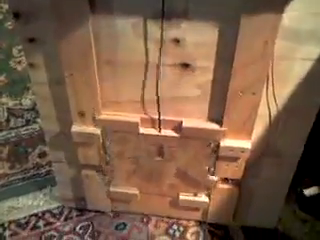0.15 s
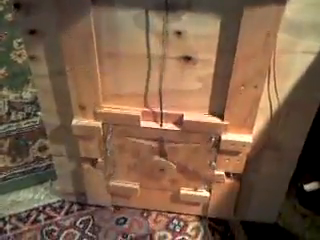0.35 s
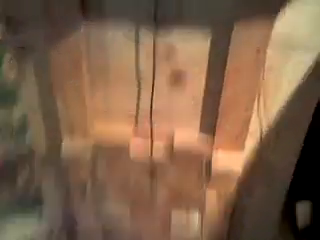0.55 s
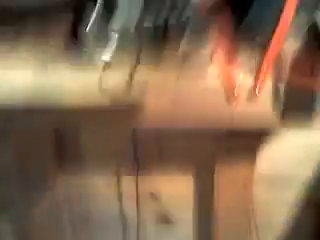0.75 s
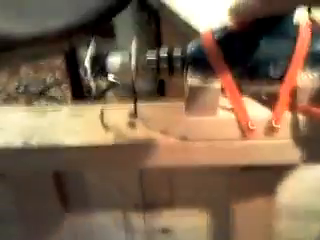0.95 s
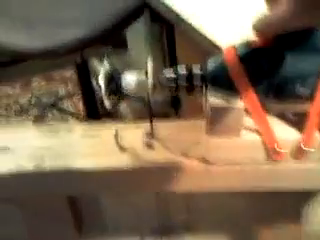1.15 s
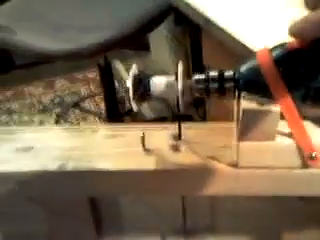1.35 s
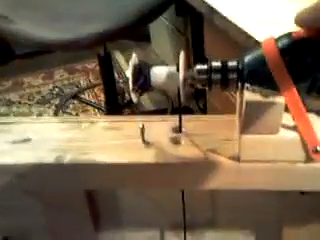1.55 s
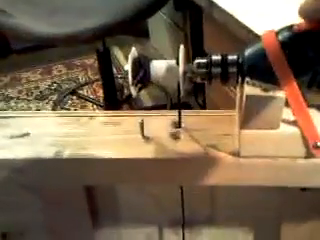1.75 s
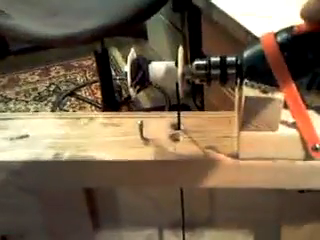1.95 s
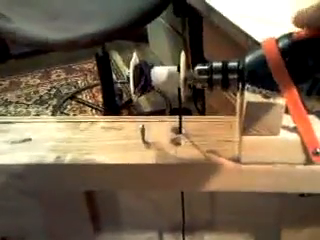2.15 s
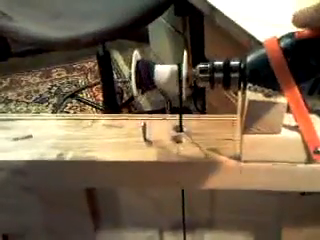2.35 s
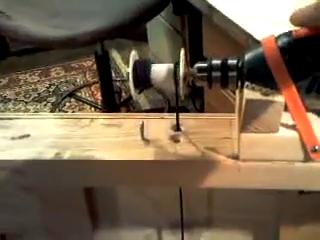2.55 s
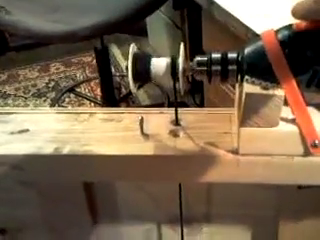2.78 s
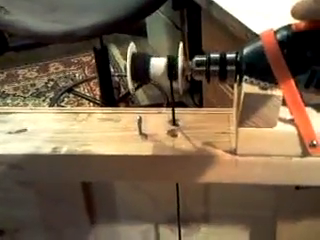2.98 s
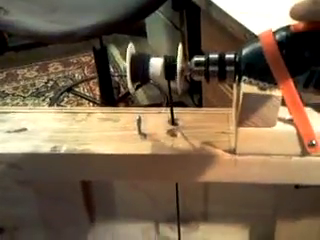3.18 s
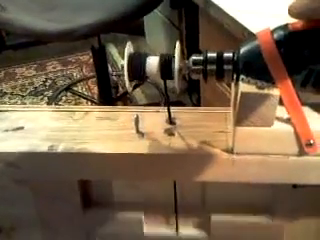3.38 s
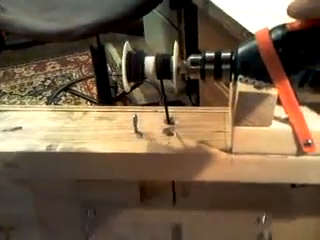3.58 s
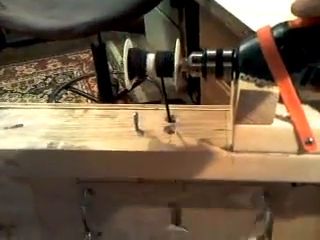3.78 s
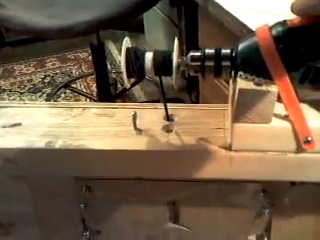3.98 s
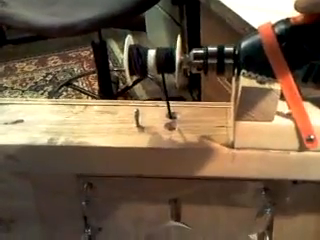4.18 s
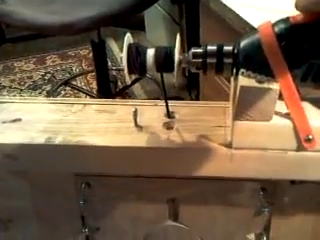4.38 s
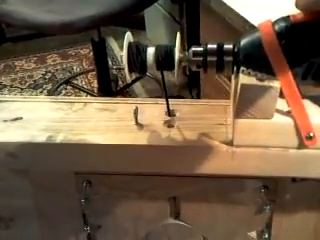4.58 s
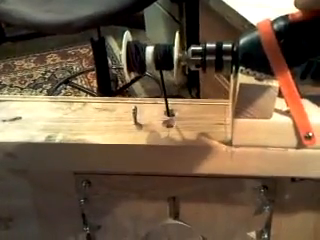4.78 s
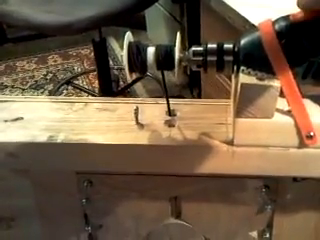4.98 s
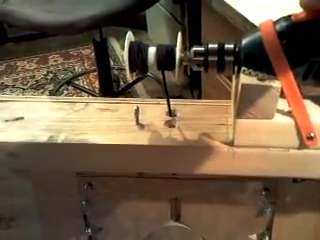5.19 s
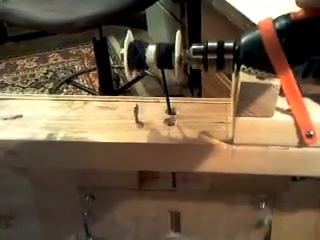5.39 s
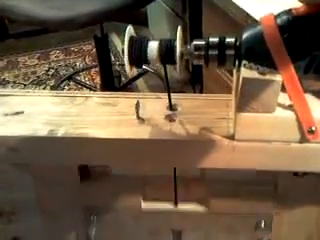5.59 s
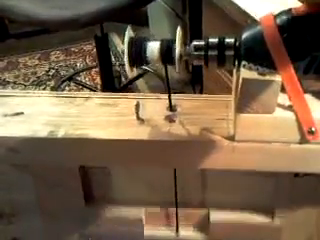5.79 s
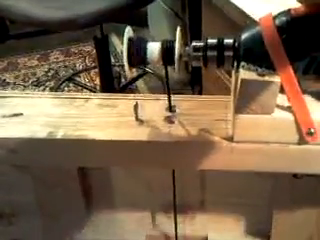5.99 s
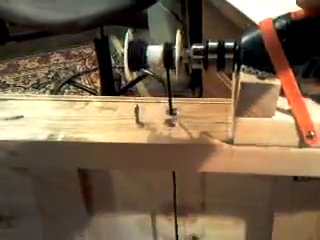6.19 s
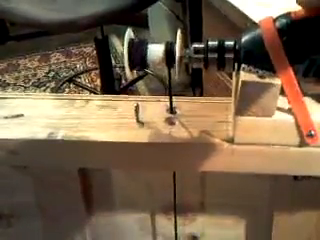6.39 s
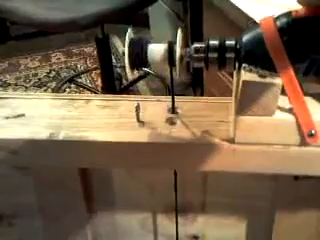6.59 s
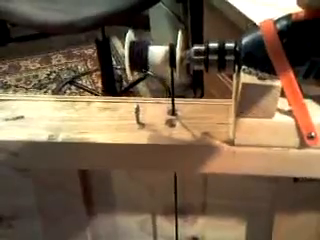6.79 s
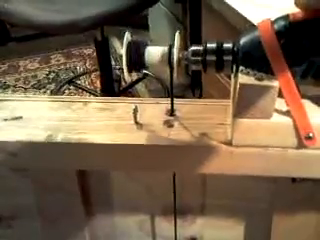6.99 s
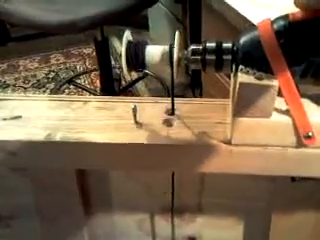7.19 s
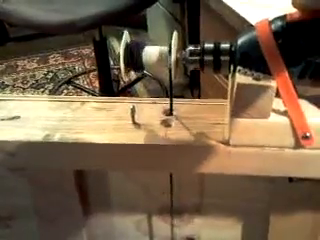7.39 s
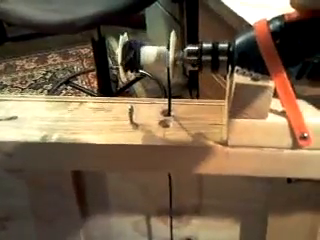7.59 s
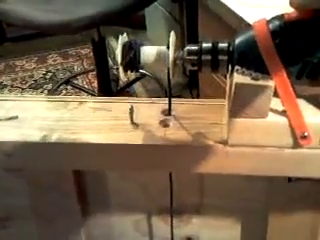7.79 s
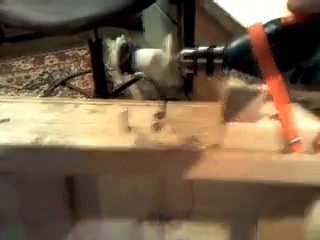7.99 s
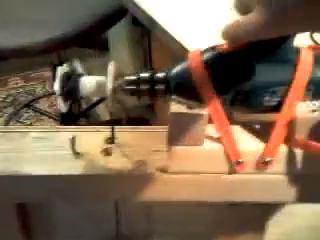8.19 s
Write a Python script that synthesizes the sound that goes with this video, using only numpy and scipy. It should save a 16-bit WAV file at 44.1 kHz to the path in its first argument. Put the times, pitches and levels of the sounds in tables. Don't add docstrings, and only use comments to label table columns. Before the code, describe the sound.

A small close microphone in a quiet room picks up low rumble, faint hums and a drill already running, lowering with a gritty geared whirr. At 0.23 s a wooden flap thuds rapidly, then slams at 0.35 s, hard enough to distort, while the brush hiss coasts away. Small ticks come near 0.7 s. A thin electronic whine at 2.05 s leads into the lift at 2.2 s: rattling, bright and hissy, climbing quickly then levelling, with knocks and a sharp slam at 2.4-2.5 s. A strong click marks 3.9 s and the motor drops dead by 4.1 s. Quiet, a faint tick at 5.0 s. At 5.2 s a duller lowering run starts, peaks in pitch around 5.75 s and slowly sags, with soft cord hum and knocks near 6.2-6.3 s. Thuds at 7.26 s and a distorted slam at 7.38 s end it; hiss coasts into quiet, with a faint tick at 8.1 s.

```python
import sys
import numpy as np
from scipy import signal
from scipy.fft import rfft, irfft, next_fast_len
from scipy.io import wavfile
from scipy.ndimage import uniform_filter1d

SR = 44100
rng = np.random.default_rng(int(sys.argv[2]) if len(sys.argv) > 2 else 0)


def invert_db(x):
    u = np.asarray(x, float) / 20
    return 10 ** u


def transcribe(signal):
    frames = np.atleast_2d(signal).T
    limited = np.clip(frames, -1, 1)
    pcm = np.round(limited * 32767).astype(np.int16)
    wavfile.write(sys.argv[1], SR, pcm)


N = 363825
TIME = np.arange(N) / SR

# time [s], effort [dB].
LOWER_END_EFFORT = [(0.0, -2.5), (0.225, -4)]
LIFT_EFFORT = [(2.2, -30), (2.28, -8), (2.36, -2), (2.5, -2), (3.6, 1.5), (3.78, -1.5), (3.9, 0),
               (3.99, -8.5), (4.06, -45)]
LOWER_EFFORT = [(5.22, -31), (5.3, -9), (5.42, -3), (5.55, -0.5), (7.26, -0.5)]
# time [s], mesh frequency [Hz].
LOWER_END_MESH = [(0, 692.3), (.225, 680.5)]
LIFT_MESH = [(2.2, 420), (2.35, 638), (2.47, 788), (2.65, 916), (2.95, 1074), (3.12, 1133), (3.28, 1171),
             (3.62, 1198), (4.08, 412)]
LOWER_MESH = [(5.22, 306), (5.55, 677), (5.74, 978), (5.95, 912), (6.25, 831), (6.43, 782), (6.7, 747),
              (7.0, 723), (7.26, 712)]
# rattle, hiss, mesh tone, other tones [dB].
LIFT_LEVELS = (-23.5, -31, -26.5, -21)
LOWER_LEVELS = (-25.5, -38.5, -31, -26.5)
ORDERS = [3, 4, 5, 6, 7, 8, 9, 11, 12, 13, 14, 16, 17, 19, 20, 21, 23, 27, 30, 33, 34, 36, 40]
LIFT_ORDERS_DB = [-13.5, -35.5, -26, -17.5, -12.5, -35, -14, -9.5, -8, -9, -49, -10.5, -4, -19, -4.5, -19,
                  -11, -20, -7, -37, -18.5, -16, -15.5]
LOWER_ORDERS_DB = [-6, -26, -20, -22, -20, -14, -6, -9, -8, -9, -20, -22, -18, -26, -24, -24, -22, -34, -34,
                   -36, -36, -36, -32]
# centre [Hz], width [Hz], gain [dB].
HOUSING = [(238, 70, -12), (296, 43, 15.5), (334, 54, 13), (550, 93, 15), (849, 100, 10.5), (1000, 140, 5),
           (1260, 48, 8), (1977, 114, 16), (2225, 145, 16), (2876, 82, 13), (3460, 110, -0.5),
           (3900, 300, 10)]
FRAME = [(743, 65, 8.5), (1000, 73, 14.5), (1200, 67, 5.5)]
VENTS = [(5750, 220, 17), (7050, 500, 13), (7950, 350, 17), (9700, 1000, -25)]
# frequency [Hz], density [dB per Hz].
RATTLE_UP = [(71, -47.5), (120, -18), (251, -14), (334, 2.5), (412, -15), (532, -3), (604, -4), (1240, 6),
             (1580, -3), (1940, 5), (2280, -3.5), (2720, -22), (3570, -10), (5240, -24), (5500, -21.5),
             (7150, -55), (12100, -120)]
RATTLE_DOWN = [(71, -41.5), (120, -12), (220, -31), (324, -4.5), (405, -19), (515, -8.5), (624, -16.5),
               (756, 2.5), (832, -9), (1010, 0), (1260, -1), (1580, -10.5), (2170, -10), (2720, -30),
               (5500, -30), (7150, -47), (12100, -120)]
HISS = [(2470, -28.5), (4200, -5.5), (4550, -22), (4920, -7.5), (5350, -25.5), (5750, -1), (6120, -8),
        (6620, -4.5), (8140, -1), (9110, -4.5), (9440, -27.5), (9690, -30.5), (9970, -23), (13000, -54.5),
        (21900, -120)]
# cycles a rotor turn, level over the hiss [dB].
COMMUTATOR = [(50, -19), (60, -15), (70, -16), (80, -16)]
# frequency [Hz], level [dB], t60 [s].
CASE_MODES = [(768, 3, 0.04), (1010, 6, 0.026), (1235, 6, .03), (1975, -10, 0.03)]
# start [s], length [s], pitch [Hz], level [dB].
CORD = [
    (0.0, 0.25, 342, -37.5),
    (5.943, 0.22, 346, -41),
    (6.191, .35, 319, -42.5),
    (6.584, 0.53, 335, -39.5),
]
# start [s], length [s], level [dB], on-share of each cycle.
SWITCH = [
    (2.05, .22, -37, .23),
    (2.3, .4, -45, .25),
    (5.215, .2, -46, .47),
    (6.3, .96, -44, .25),
]
SWITCH_MULTIPLES = [1, 2, 3, 6, 7, 8, 9]
SWITCH_DB = [-1.5, 0, -22, -31, -38, -20, -9.5]
# start [s], peak [dB], contact time [s], treble tilt [dB an octave], pitch of the struck spot [Hz].
THUDS = [
    (.228, 1, 0.011, -10, 325),
    (.235, -8.5, 0.0067, 11, 1040),
    (.243, 1.5, .012, -6.5, 311),
    (.259, -6.5, 0.014, 2, 2126),
    (6.228, -14.5, 0.004, -9, 300),
    (6.255, -10, 0.016, -7, 231),
    (7.262, 1, 0.018, -5, 296),
    (7.272, -5.5, 0.011, 3.5, 774),
    (7.288, -0.5, 0.021, -3, 328),
]
SLAMS = [
    (.3462, 4.5, 0.0095, -2.4, 1400),
    (2.4968, 4, 0.014, 1, 1020),
    (2.519, -21, 0.0027, 0.34, 1150),
    (7.377, 5, 0.015, -0.94, 1010),
    (7.402, -14, 0.0059, -1.1, 921),
]
TICKS = [(0.715, -25, 0.0034, -16, 525), (0.728, -31, 0.003, -4, 875), (0.752, -20.5, 0.0058, 8, 252),
         (0.754, -9, 0.0017, 9, 1470), (2.156, -18, 0.0087, -2, 1030), (2.28, -33, 0.0035, -6, 732),
         (2.413, -9.5, 0.009, 0, 1000), (2.427, -6, 0.0081, 0.5, 1250), (3.589, -23, 0.0031, 1.5, 1200),
         (3.733, -24, 0.003, 1.5, 972), (3.883, -4, 0.0054, 8, 706), (5.034, -31.5, 0.0095, -7, 794),
         (5.294, -17.5, 0.003, 0, 977), (5.489, -19, 0.0041, 13, 1000), (5.72, -18, 0.0027, 9, 953),
         (6.314, -7, 0.009, 7, 777), (8.132, -24.5, 0.0034, -6, 497)]
# frequency [Hz], level [dB], t60 [s].
THUD_MODES = [(325, -1.5, .04), (430, -8.5, 0.038), (605, 1.5, 0.023), (1056, 4, 0.05), (1400, -18, 0.027)]
SLAM_MODES = [(438, -11, 0.1), (576, -9.5, 0.11), (813, -5, .07), (899, 0.5, 0.11), (1030, -4, 0.08),
              (1147, 16.5, 0.014), (1360, -15, 0.037), (1657, -4, 0.072), (2050, -5, .04),
              (2980, -11.5, 0.062), (4130, -17.5, 0.04)]
TICK_MODES = [(264, -19, 0.016), (600, -24, 0.01), (1070, 2, 0.013), (1830, -22.5, .01)]
# frequency [Hz], density [dB per Hz].
CRACK = [(88, -19), (150, -13.5), (679, -4.5), (1370, -4), (1980, -2.5), (2770, -18.5), (4850, -21),
         (5890, -38), (7530, -30.5), (9970, -76), (13000, -75), (21900, -120)]
FLOOR = [(8.8, -31), (15, 3.5), (48, -6), (147, -6.5), (283, -15), (361, -15), (449, -18), (962, -19),
         (1040, -22), (1160, -19), (2490, -33), (5790, -32.5), (8020, -35.5), (8700, -38), (9970, -51.5),
         (13000, -99.5), (21900, -120)]
# frequency [Hz], t60 [s].
ROOM = [(200, 0.49), (400, 0.42), (700, 0.46), (2000, 0.3), (4000, 0.2), (9000, 0.14)]
# frequency [Hz], level [dB].
HUMS = [(39.5, -44.5), (79, -53), (118.4, -62), (158, -58), (360.7, -62.5), (1044, -59.5), (4425, -76.5),
        (5750, -74), (6492, -73), (8619, -76.5), (8689, -71.5)]


def evened(x):
    return x / np.sqrt(np.mean(x ** 2) + 1e-20)


def read(points, hz):
    f, value = np.transpose(points)
    return np.interp(np.log(hz + 1), np.log(f + 1), value)


def add(mix, s, sound):
    part = mix[round(s * SR):][:len(sound)]
    part += sound[:len(part)]


def coloured(x, points, tilt_db=0):
    size = next_fast_len(len(x))
    hz = np.fft.rfftfreq(size, 1 / SR)
    gain = invert_db(read(points, hz) + tilt_db * np.log2(hz / 1000 + 0.09))
    return evened(irfft(rfft(x, size) * gain, size)[:len(x)])


def wander(size, rate_hz):
    knots = rng.standard_normal(int(size / SR * 400) + 3)
    knots = uniform_filter1d(knots, max(int(400 / rate_hz), 1))
    return evened(np.interp(np.arange(size) * 400 / SR, np.arange(len(knots)), knots))


def resonance_db(hz, resonances):
    return sum(db / (1 + (2 * (hz - f) / width) ** 2) for f, width, db in resonances)


def background():
    hums = np.zeros(N)
    for hz, db in HUMS:
        hums += invert_db(db + 1.2 * wander(N, 3.6)) * np.sqrt(2) * np.sin(2 * np.pi * hz * TIME)
    floor_db = -43.5 + 0.24 * wander(N, 15)
    return invert_db(floor_db) * coloured(rng.standard_normal(N), FLOOR) + hums


def repeating(turns):
    shapes = rng.standard_normal((2, 257))
    shapes[:, -1] = shapes[:, 0]
    a, b = (np.interp(turns % 1, np.linspace(0, 1, 257), shape) for shape in shapes)
    return evened(a * np.cos(0.032 * turns) + b * np.sin(0.029 * turns))


def chatter(size, per_s):
    t = np.arange(2000) / SR
    ring = sum(invert_db(db - 60 * t / t60) * np.sin(2 * np.pi * hz * t) for hz, db, t60 in CASE_MODES)
    ring *= np.minimum(t / .0015, 1)
    taps = rng.standard_normal(size) * (rng.random(size) < per_s / SR)
    return evened(signal.oaconvolve(taps, ring)[:size])


def rotor_tones(t, turns, rotor_hz, mesh_db, tones_db, orders_db, throb):
    size = len(t)
    out = np.sqrt(2) * throb * invert_db(mesh_db + wander(size, 25)) * np.sin(2 * np.pi * 10 * turns)
    for order, db in zip(ORDERS, orders_db):
        shell_db = resonance_db(order * rotor_hz[::200], HOUSING) - 10
        colour_db = np.interp(t, t[::200], shell_db) + 2.1 * wander(size, 24)
        out += invert_db(tones_db + db + colour_db) * np.sin(2 * np.pi * (order * turns + rng.random()))
    return out


def gear_rattle(turns, slack, throb, flaw, colour):
    size = len(turns)
    gate = (2.3 + np.exp(-(turns % 1) / 0.61)) * throb
    teeth = evened(gate * rng.standard_normal(size)) + flaw * (1 - slack) * repeating(turns)
    teeth += signal.lfilter(*signal.iirpeak(2980, 18, fs=SR), 2.2 * teeth)
    return (1 - 0.33 * slack) * coloured(teeth, colour) + 1.18 * slack * chatter(size, 650)


def brush_hiss(turns, rotor_hz, slack, flaw, bars_db):
    size = len(turns)
    sparks = evened((0.57 + np.exp(-(5 * turns % 1) / 0.21)) * rng.standard_normal(size))
    hiss = coloured(sparks + 0.63 * flaw * (1 - slack) * repeating(turns), HISS)
    for order, db in COMMUTATOR:
        bar_db = bars_db + db - 20 * slack + resonance_db(order * rotor_hz, VENTS)
        smear = .6 * wander(size, 60)
        hiss += invert_db(bar_db) * np.sin(2 * np.pi * order * turns + smear)
    return hiss


def motor(effort, mesh, levels_db, orders_db, rattle, flaw, tight_hz, bars_db, coast_s, coast_db_per_s):
    s, effort_points_db = np.transpose(effort)
    t = np.arange(s[0], s[-1] + coast_s, 1 / SR)
    after = np.maximum(t - s[-1], 0)
    size = len(t)
    effort_db = np.interp(t, s, effort_points_db)
    mesh_hz = np.interp(t, *np.transpose(mesh))
    octaves = np.log2(mesh_hz / 1000)

    rattle_db = levels_db[0] + effort_db
    hiss_db = levels_db[1] + 1.3 * effort_db + 4 * octaves
    mesh_db = levels_db[2] + 0.76 * effort_db + resonance_db(mesh_hz, FRAME)
    tones_db = levels_db[3] + 0.76 * effort_db + 14.5 * octaves

    rotor_hz = mesh_hz / 10 * (1 + .0008 * wander(size, 30))
    turns = np.cumsum(rotor_hz) / SR
    slack = np.clip((tight_hz - mesh_hz) / 130, 0, 1)
    throb = 1 + 0.2 * np.sin(2 * np.pi * .19 * turns)

    out = rotor_tones(t, turns, rotor_hz, mesh_db, tones_db, orders_db, throb)
    out *= invert_db(-20 * slack - 900 * after)
    out += invert_db(rattle_db + 0.72 * wander(size, 40)) * gear_rattle(turns, slack, throb, flaw, rattle)
    out *= invert_db(-1.3 * coast_db_per_s * after)
    hiss_db = hiss_db + 0.68 * wander(size, 20) - coast_db_per_s * after
    out += invert_db(hiss_db) * brush_hiss(turns, rotor_hz, slack, flaw, bars_db)

    fade_in = np.clip((t - t[0]) / 0.019 + (t[0] == 0), 0, 1)
    fade_out = np.clip((t[-1] - t) / 0.15, 0, 1)
    return t[0], out * fade_in * fade_out


def whine(start, length, hz, db, multiples, tones_db, waver, flutter_db, edge_s):
    t = np.arange(0, length, 1 / SR)
    turns = np.cumsum(hz * (1 + waver * wander(len(t), 55))) / SR
    tone = sum(invert_db(d) * np.sin(2 * np.pi * k * turns) for k, d in zip(multiples, tones_db))
    edges = np.clip(np.minimum(t, length - t) / edge_s, 0, 1)
    return start, np.sqrt(2) * invert_db(db + flutter_db * wander(len(t), 25)) * tone * edges


def cord_hum(row):
    return whine(*row, [1], [0], 0.018, 3.0, .015)


def switch_whine(start, length, db, duty):
    pulse = abs(np.sin(np.pi * duty * np.array(SWITCH_MULTIPLES)))
    tones_db = np.array(SWITCH_DB) + 20 * np.log10(pulse + 1e-3)
    return whine(start, length, 489.9, db, SWITCH_MULTIPLES, tones_db, 0.00036, 2.6, 0.02)


def knocks(events, modes, ring, boost_db, crack_share, spot_db):
    out, t = np.zeros(N), np.arange(6000) / SR
    for s, db, contact, tilt_db, spot_hz in events:
        noise = rng.standard_normal((2, len(t)))
        body = np.zeros(len(t))
        for hz, mode_db, t60 in modes:
            mode_db = mode_db + tilt_db * np.log2(hz / spot_hz) - 60 * t / (ring * t60)
            body += invert_db(mode_db) * np.sin(2 * np.pi * hz * rng.uniform(1.0, 1.02) * t)
        pressed = np.exp(-(t / contact) ** 2)
        body = signal.fftconvolve(body, (noise[0] * pressed)[:1500])[:len(t)]
        body /= abs(body).max()

        spot = np.exp(-(t / (1.17 * contact)) ** 2) * np.minimum(t / (0.34 * contact), 1)
        spot *= np.sin(2 * np.pi * spot_hz * t)
        spot *= invert_db(spot_db - np.log2(spot_hz / 400))

        crack = coloured(noise[1], CRACK, tilt_db) * np.exp(-(t / contact) ** 1.9)
        crack *= np.minimum(t / (0.21 * contact), 1) / 1.83
        add(out, s, invert_db(db + boost_db) * ((1 - crack_share) * (body + spot) + crack_share * crack))
    return out


def room(x):
    taps = np.zeros(SR // 2)
    at = np.arange(300, len(taps) - 20, 20)
    taps[at + rng.integers(0, 20, len(at))] = rng.choice([-1., 1.], len(at))
    hz, t, z = signal.stft(taps, SR, nperseg=256)
    decay = invert_db(-60 * t / read(ROOM, hz)[:, None])
    tail = signal.istft(z * decay, SR, nperseg=256)[1]
    return signal.fftconvolve(x, tail / np.linalg.norm(tail))[:N]


def scene():
    drill = np.zeros(N)
    add(drill, *motor(LOWER_END_EFFORT, LOWER_END_MESH, LOWER_LEVELS, LOWER_ORDERS_DB, RATTLE_DOWN,
                      flaw=0.54, tight_hz=712, bars_db=-14, coast_s=0.4, coast_db_per_s=20))
    add(drill, *motor(LIFT_EFFORT, LIFT_MESH, LIFT_LEVELS, LIFT_ORDERS_DB, RATTLE_UP,
                      flaw=.75, tight_hz=760, bars_db=1.5, coast_s=.01, coast_db_per_s=40))
    add(drill, *motor(LOWER_EFFORT, LOWER_MESH, LOWER_LEVELS, LOWER_ORDERS_DB, RATTLE_DOWN,
                      flaw=0.5, tight_hz=673, bars_db=-13.5, coast_s=0.46, coast_db_per_s=29))
    for row in CORD:
        add(drill, *cord_hum(row))
    for row in SWITCH:
        add(drill, *switch_whine(*row))

    thuds = knocks(THUDS, THUD_MODES, ring=0.82, boost_db=-0.42, crack_share=0.37, spot_db=-1.7)
    slams = knocks(SLAMS, SLAM_MODES, ring=0.78, boost_db=5.7, crack_share=0.5, spot_db=-4.5)
    ticks = knocks(TICKS, TICK_MODES, ring=0.66, boost_db=-1.4, crack_share=0.46, spot_db=2.3)
    panel = signal.butter(3, 185, "high", fs=SR, output="sos")
    thuds, slams = signal.sosfilt(panel, [thuds, slams])

    near = drill + thuds + slams + ticks
    far = invert_db(-12) * (room(drill) + room(slams + .45 * thuds + .4 * ticks))
    return (near + far + background())[None]


def roll_off(x):
    return signal.sosfilt(signal.butter(12, 15760, fs=SR, output="sos"), x)


def record(dry):
    band = signal.firwin(101, 10230, window=("kaiser", 8), fs=SR)
    narrow = signal.oaconvolve(dry, band[None], "same")
    ceiling = .7
    clipped = narrow / (1 + abs(narrow / ceiling) ** 30) ** (1 / 30)
    softened = signal.lfilter(*signal.butter(2, 10800, fs=SR), clipped)
    return roll_off(softened)


dry = scene()
out = record(dry)
transcribe(out)
```